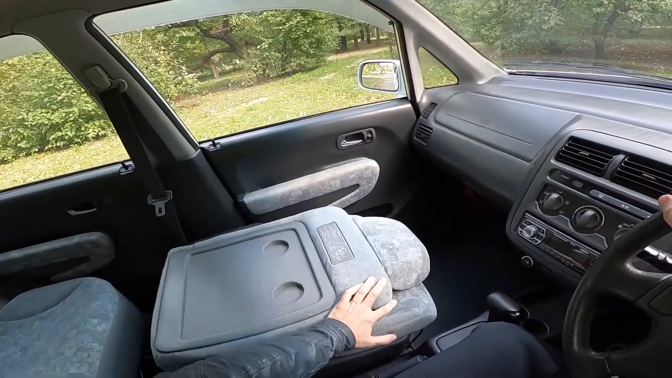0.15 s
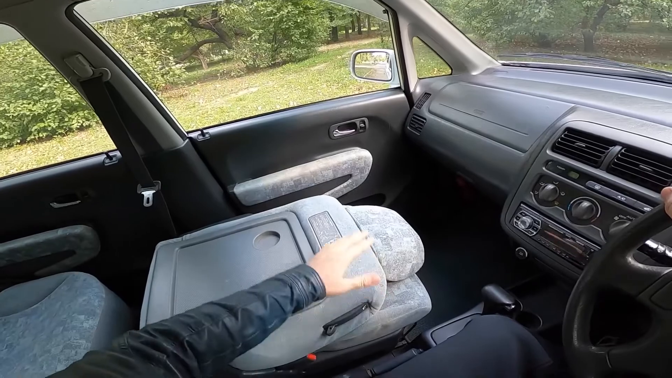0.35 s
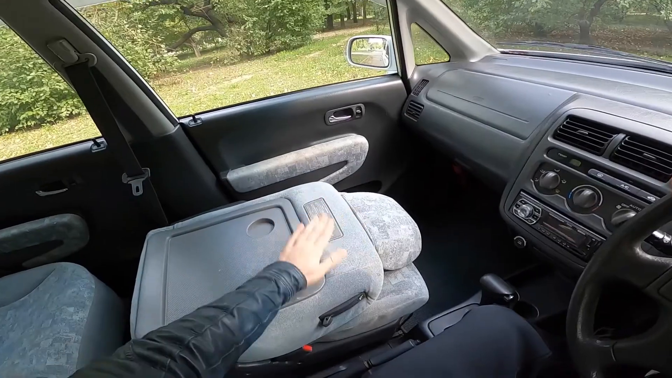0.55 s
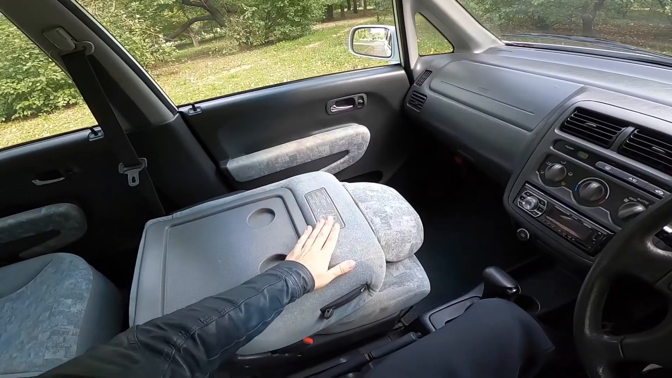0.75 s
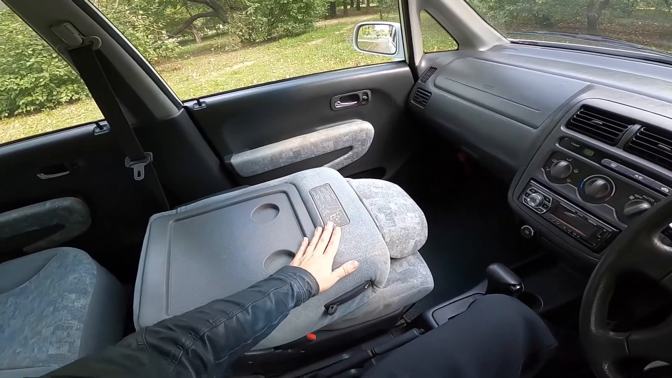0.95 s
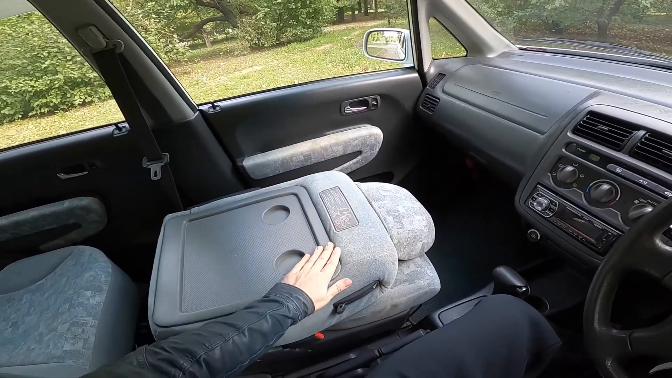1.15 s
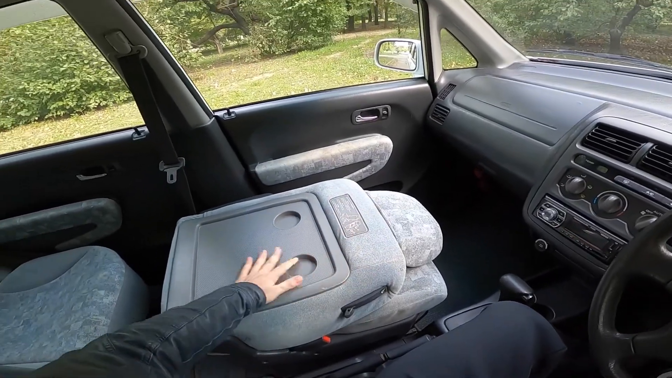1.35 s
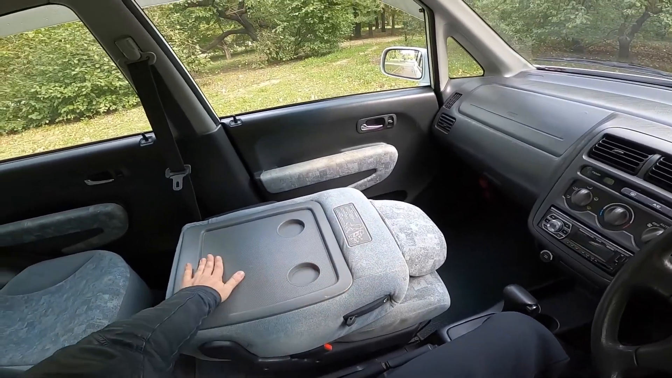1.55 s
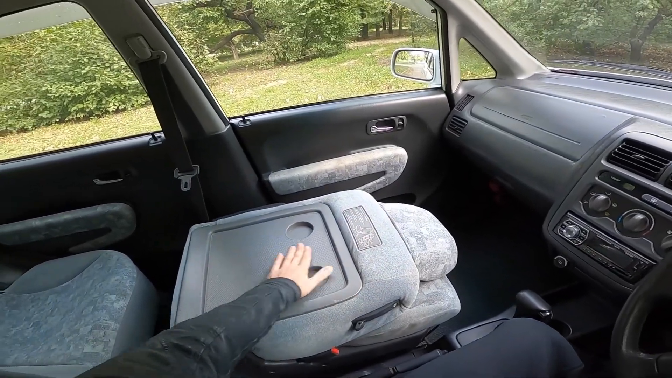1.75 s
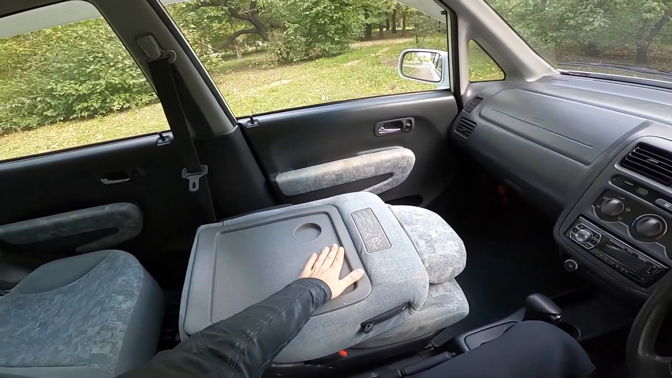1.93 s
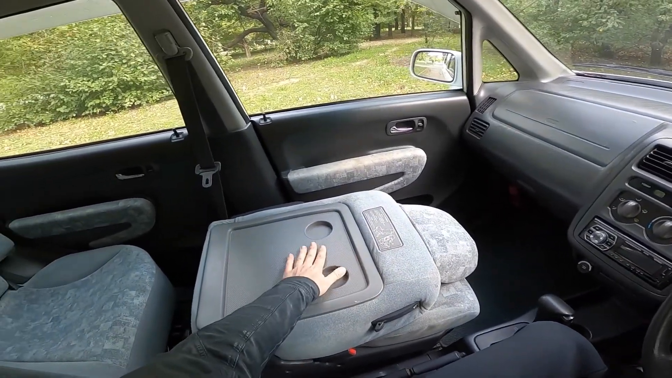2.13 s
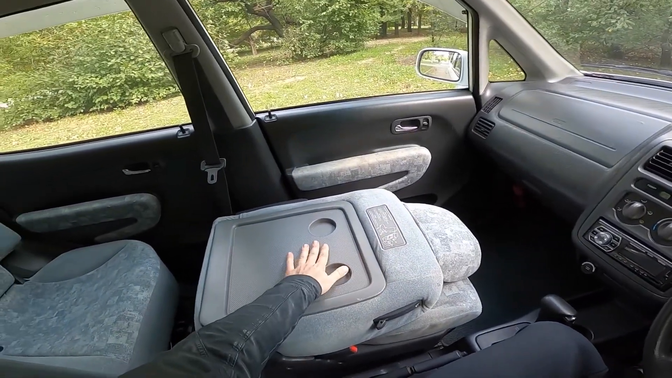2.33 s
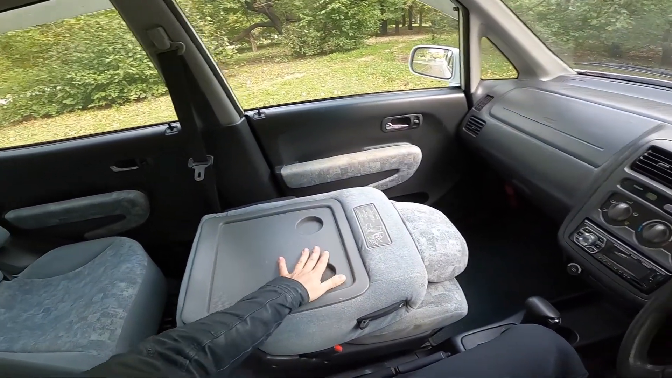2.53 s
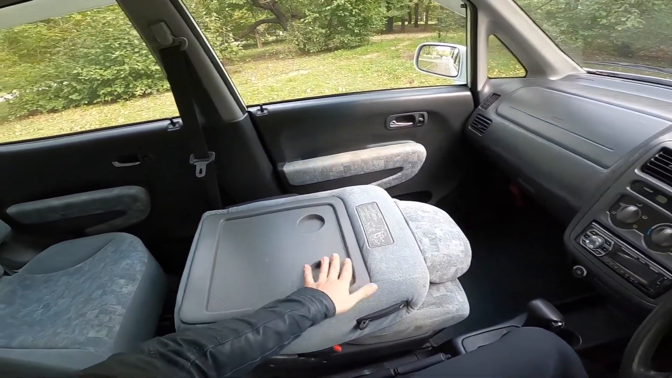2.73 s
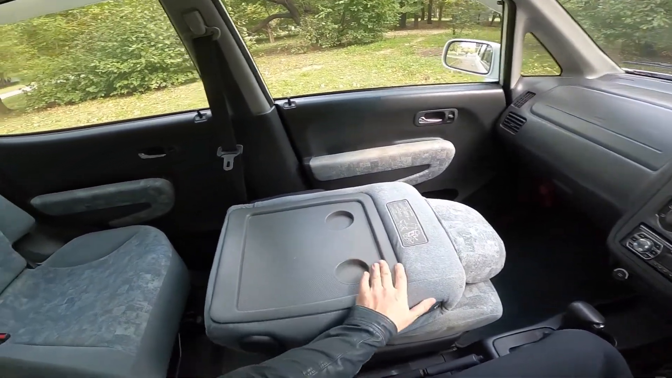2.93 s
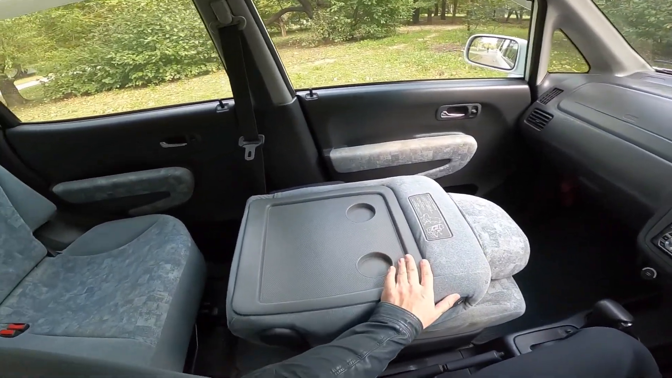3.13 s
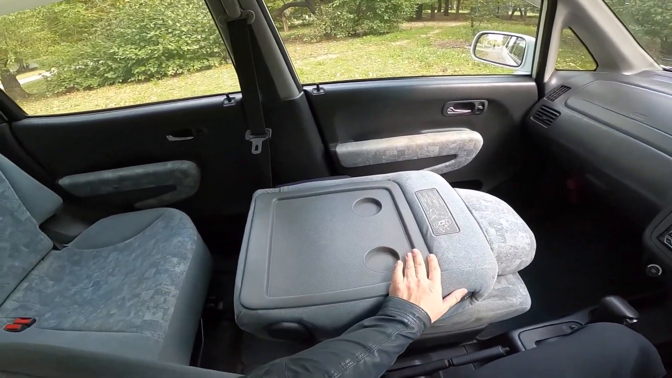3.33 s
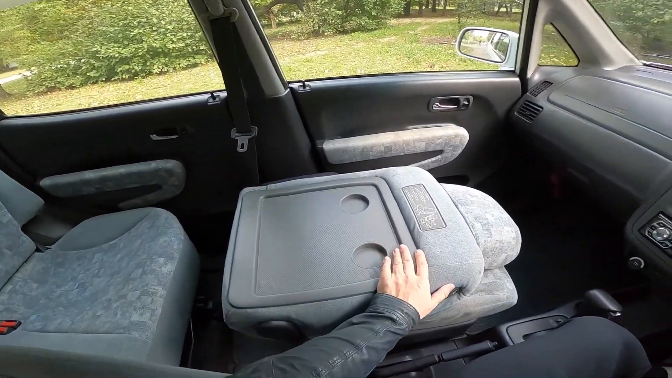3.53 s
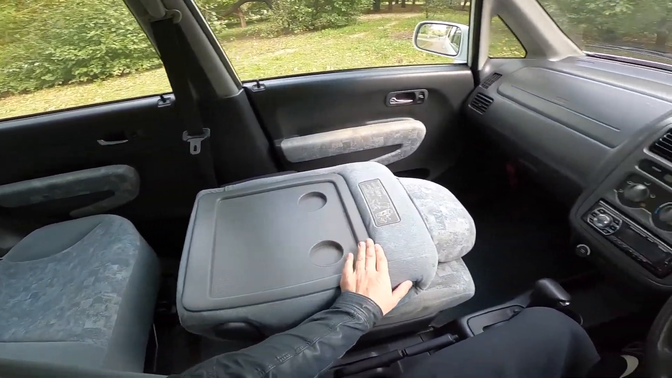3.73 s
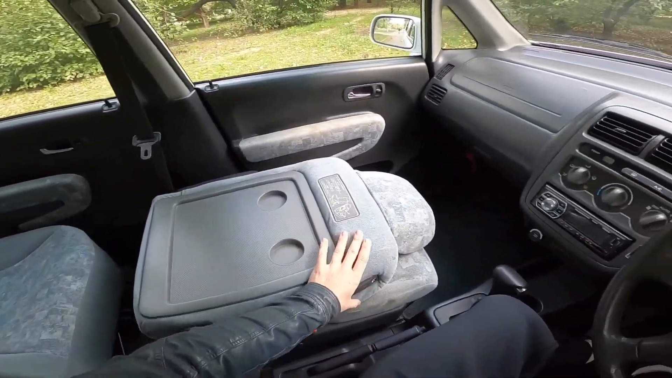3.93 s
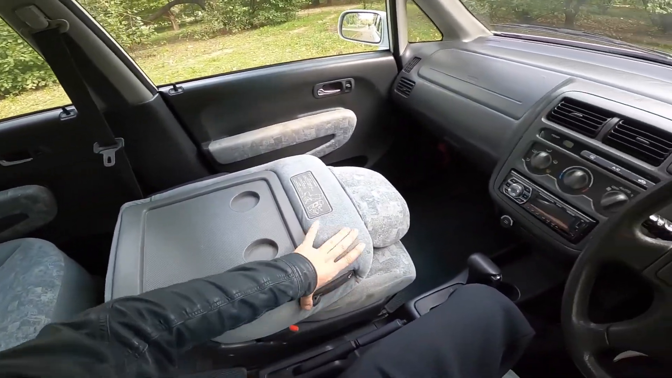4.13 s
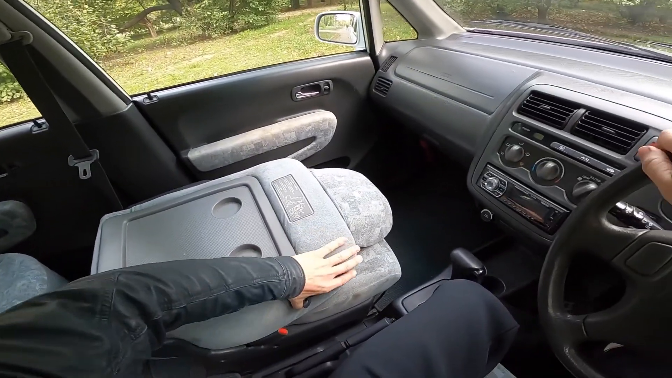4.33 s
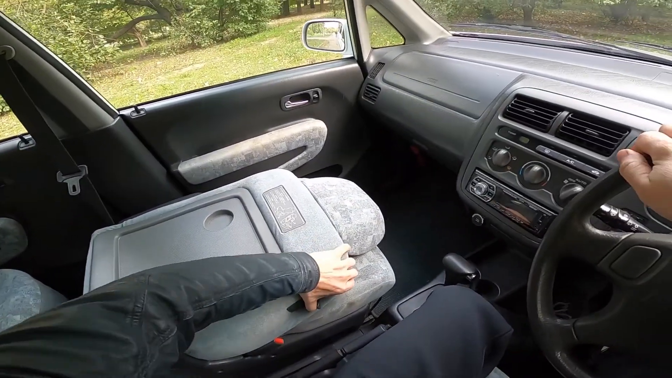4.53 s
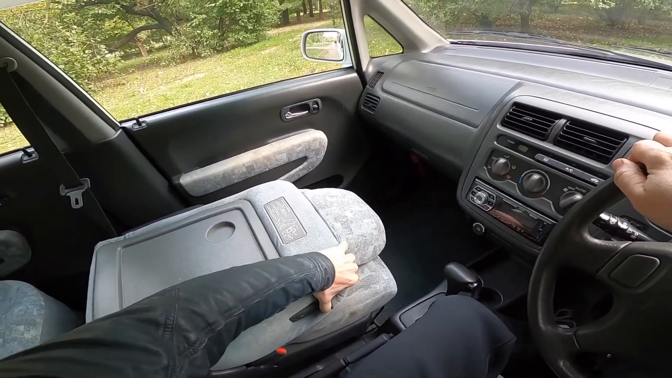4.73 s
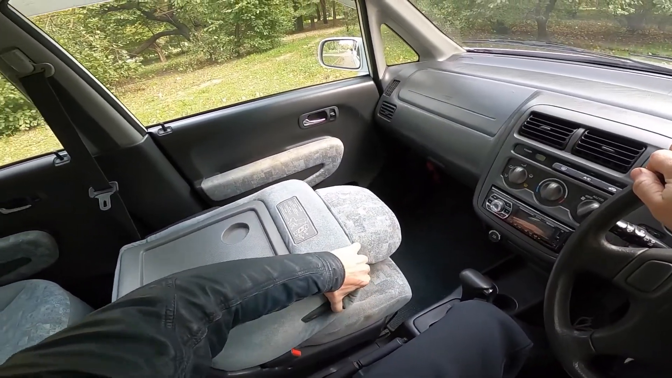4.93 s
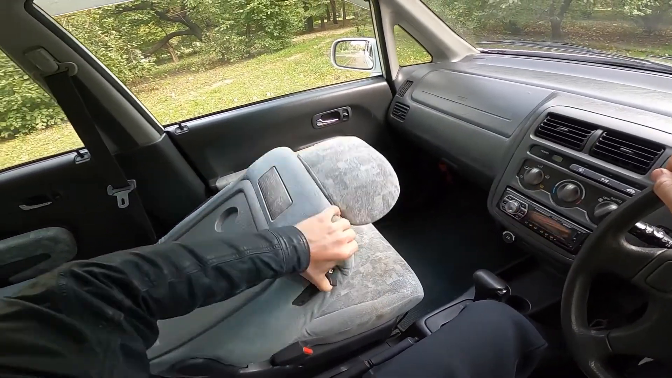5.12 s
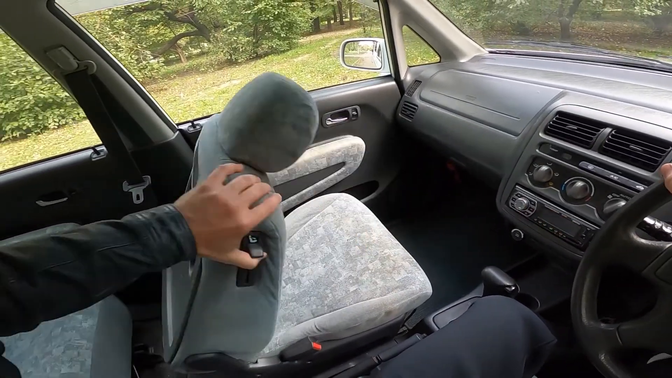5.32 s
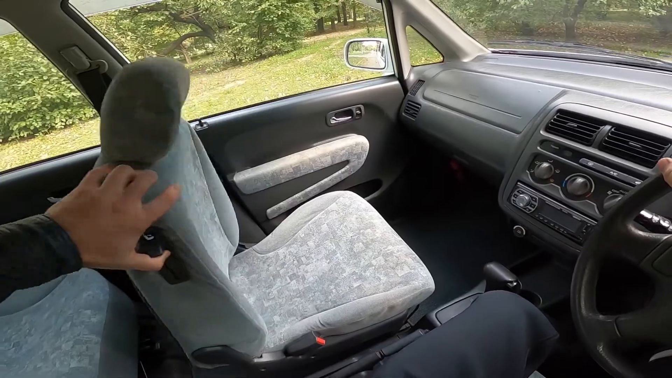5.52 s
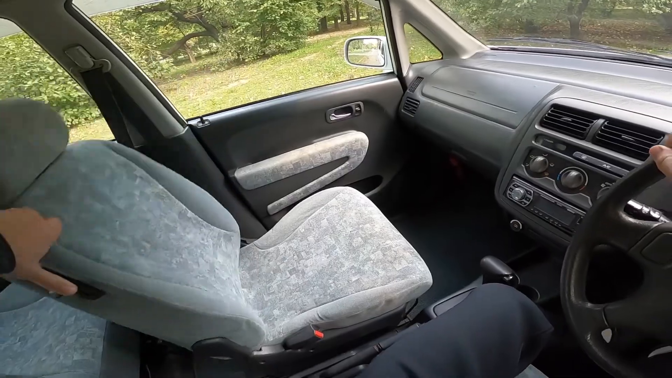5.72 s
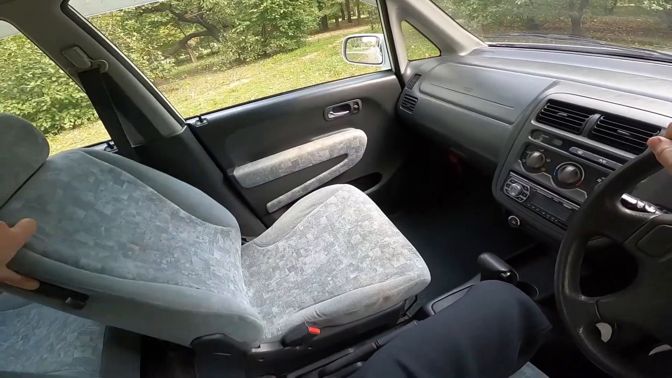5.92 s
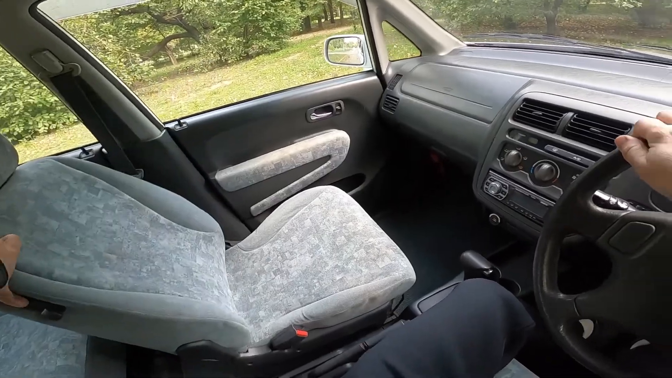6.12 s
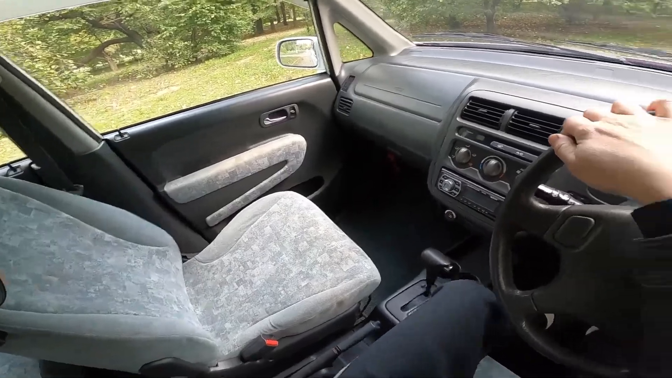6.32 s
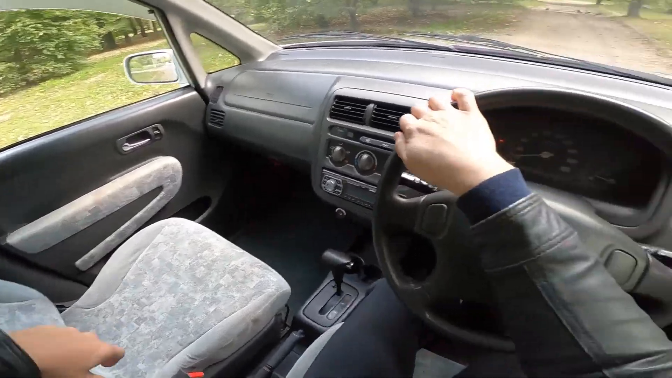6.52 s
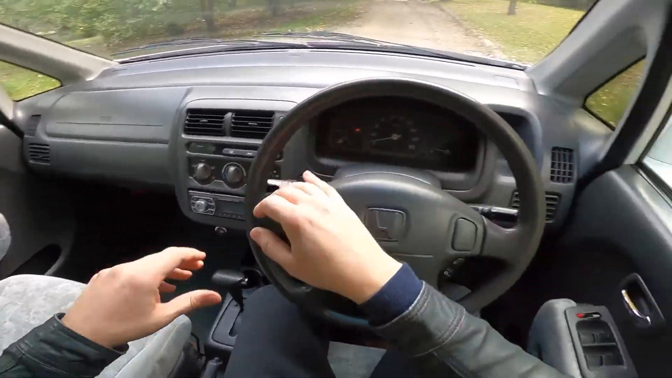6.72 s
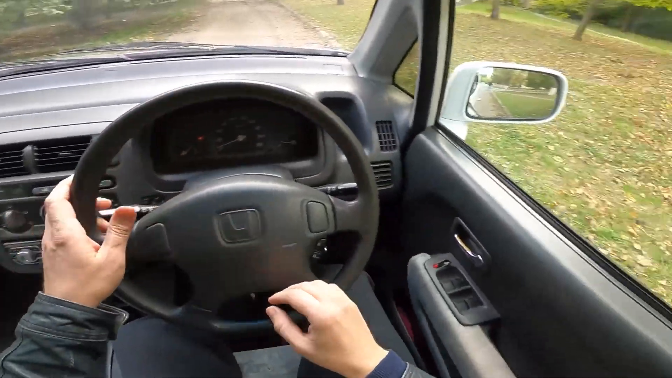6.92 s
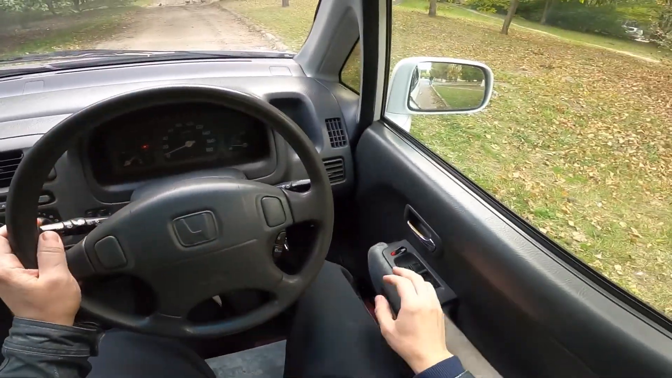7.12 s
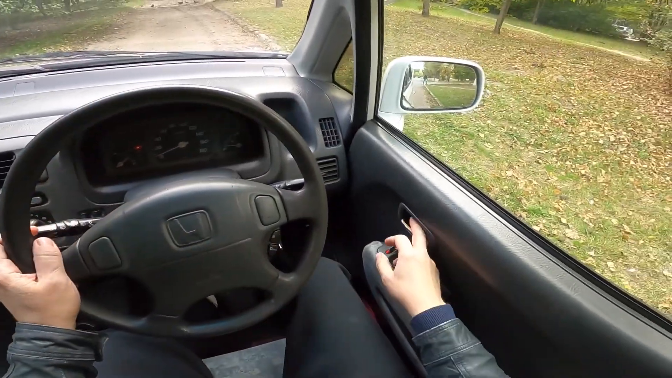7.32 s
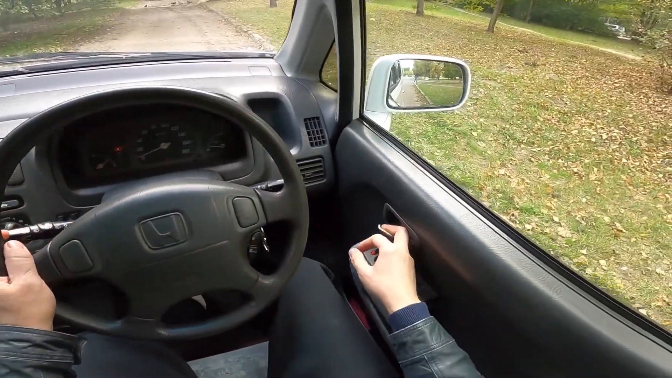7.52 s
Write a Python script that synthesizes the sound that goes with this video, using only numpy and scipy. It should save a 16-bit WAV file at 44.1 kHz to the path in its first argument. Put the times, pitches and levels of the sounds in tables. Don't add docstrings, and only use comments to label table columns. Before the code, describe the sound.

Close inside a small parked car with a low idling hum, a hand slaps a folded seat's plastic tray, slaps again with thuds, then rubs it in loud grainy strokes. After a quieter stretch of sleeve rustle, a lever squeaks and clicks, the seat back swings and bangs into its lock, bounces faintly, and a door latch clacks with a drumming panel. Small stereo camera microphone near the arm, short dry cabin echoes.

```python
import sys
import numpy as np
from scipy import signal
from scipy.fft import rfft, irfft
from scipy.io import wavfile
from scipy.ndimage import uniform_filter1d

SR = 44100
rng = np.random.default_rng(int(sys.argv[2]) if len(sys.argv) > 2 else 0)


def volts_from_db(level):
    exponent = np.asarray(level, float) / 20
    return 10 ** exponent


def wav_out(sig):
    wavfile.write(sys.argv[1], SR, np.round(np.clip(np.atleast_2d(sig).T, -1, 1) * 32767).astype(np.int16))


N = 337806


def evened(x):
    return x / np.sqrt(np.mean(x ** 2) + 1e-20)


def read(points, hz):
    f, value = np.transpose(points)
    return np.interp(np.log(hz + 1), np.log(f + 1), value)


def add(mix, start_s, sound):
    part = mix[..., round(start_s * SR):][..., :sound.shape[-1]]
    part += sound[..., :part.shape[-1]]


def follow(s, db):
    return volts_from_db(np.interp(np.arange(N) / SR, s, db))


def moves(rows, shape, rest_db, rest_colour):
    s = np.arange(0, N / SR + .01, .001)
    peak, rise, fall, db, colour = np.transpose(rows)[..., None]
    away = np.maximum((peak - s) / abs(rise), (s - peak) / abs(fall))
    power = volts_from_db(np.maximum(2 * (db - 20 * away ** shape), -400))
    rest = volts_from_db(2 * rest_db)
    total = power.sum(0) + rest
    return s, 10 * np.log10(total), ((power * colour).sum(0) + rest * rest_colour) / total


# pitch_hz, likeness (1 = same)
LIKENESS = [(60, 1), (300, 0.98), (700, 0.88), (1500, 0.39), (3000, 0.74), (7000, 0.098), (15000, 0.54)]


def ported(colour_db, patchy_db, flicker_db, size):
    frames = 4 * N // size + 5
    hz = np.fft.rfftfreq(size, 1 / SR)[:, None]
    a, b, c, d, patches = rng.standard_normal((frames, len(hz), 5)).T
    patches = uniform_filter1d(patches, size=4, axis=0)
    patches = evened(uniform_filter1d(patches, size=12, axis=1))
    flicker = evened(uniform_filter1d(rng.standard_normal(frames), size=3))
    gain = volts_from_db(colour_db(hz, np.arange(frames) * size / 4 / SR))
    gain = gain / np.sqrt((gain ** 2).mean(0))
    gain = gain * volts_from_db(patchy_db * patches + flicker_db * flicker)
    same = np.clip(read(LIKENESS, hz), -1, 1)
    left = a + 1j * b
    right = same * left + np.sqrt(1 - same ** 2) * (c + 1j * d)
    spectra = np.array([left, right]) * gain
    return evened(signal.istft(spectra, nperseg=size, noverlap=3 * size // 4)[1][:, :N])


# time_s, level_db
IDLE_LEVEL = [(0, -53), (.45, -39), (1.1, -31), (1.2, -36.5), (1.47, -32.5), (1.73, -37.5), (2.15, -30.5),
              (3.5, -29.5), (4.5, -30), (5.67, -31), (6.2, -35.5), (6.4, -35), (6.6, -36.5), (7.1, -32.5),
              (7.66, -27)]
# multiple of the turning rate, level_db
IDLE_ORDERS = [(1, 0), (2, -22.5), (4.5, -16)]
IDLE_HZ = 24.1


def idle():
    t = np.arange(N) / SR
    orders = 0
    for multiple, db in IDLE_ORDERS:
        orders = orders + volts_from_db(db) * np.sin(2 * np.pi * (multiple * IDLE_HZ * t + rng.random()))
    return np.sqrt(2) * follow(*np.transpose(IDLE_LEVEL)) * orders


# pitch_hz, level_db (per Hz)
CABIN_COLOUR = [(18, -24), (30, 4), (80, -22.5), (107, -14), (140, -17), (202, -22), (309, -30),
                (367, -34.5), (428, -36), (926, -51), (1240, -48.5), (3000, -81), (3900, -101),
                (6600, -120)]
# (above 200 Hz, against the boom)
SHAKES = [
    (.19, 0.62, 0.25, -22.5, -4.5),
    (.74, 0.36, 0.26, -29, -4),
    (1.55, 0.75, 4.1, -38, 1.5),
    (4.3, 6, 5.3, -38, 6),
    (2.94, 0.84, 0.44, -41, 2.5),
    (5.95, 0.45, 0.24, -21, -4.5),
    (6.78, 0.44, 1.6, -35.5, -2.5),
    (7.66, 0.88, .5, -34, 0.5),
]


def rumble():
    s, db, hum_db = moves(SHAKES, shape=1.24, rest_db=-41.5, rest_colour=-4)

    def colour_db(hz, at):
        return read(CABIN_COLOUR, hz) + np.interp(at, s, hum_db) * (hz > 200)
    return follow(s, db + 1.0) * ported(colour_db, 0.51, 1.92, size=2048)


# pitch_hz, level_db (per Hz)
CLOTH_COLOUR = [(350, -30.5), (600, -1), (716, -1.5), (903, -9), (980, -1), (1200, -5.5), (1380, -6),
                (1760, -9.5), (2080, -6.5), (2350, -9.5), (6440, -18.5), (12400, -37.5), (15600, -55.5)]
# peak_s, rise_s, fall_s, level_db, brightness_db (per octave)
ARM_MOVES = [(0, .1, 0.29, -46.5, -2), (.5, .5, 1, -61, -2), (1.15, .5, .3, -65.5, 7.5),
             (1.48, 0.25, 0.1, -45, 4), (1.77, .2, .13, -47.5, 6.5), (2.03, 0.088, 0.2, -48.5, 5),
             (2.5, 0.14, 0.23, -52.5, 2.5), (2.78, 0.16, 0.42, -51.5, 1.5), (3.49, 0.22, .07, -59.5, -4),
             (3.68, .25, .5, -59, -1), (3.88, 0.37, .1, -58.5, 5.5), (4.03, 0.25, .5, -58.5, 2),
             (4.42, 0.59, .5, -59.5, 4.5), (4.82, 0.34, 0.25, -60.5, 0.5), (5.18, .6, 0.51, -59, 0),
             (5.72, 1.1, 0.36, -53, 1.5), (5.88, .1, 0.12, -48, -2), (6.38, 0.074, 0.16, -71.5, 7.5),
             (6.5, .2, .2, -66.5, -0.5), (6.58, 0.025, .25, -59, 2.5), (6.98, 0.42, .35, -52.5, 1),
             (7.18, 0.14, .06, -54.5, 1.5), (7.38, 0.22, .28, -53.5, 0), (7.6, 0.14, .2, -60.5, -1.5)]


def sleeve():
    s, db, tilt = moves(ARM_MOVES, shape=1.57, rest_db=-69.5, rest_colour=-1.5)

    def colour_db(hz, at):
        return read(CLOTH_COLOUR, hz) + np.interp(at, s, tilt) * np.log2(hz / 2500 + 0.077)
    return follow(s, db + 2.0) * ported(colour_db, 1.4, 0.26, size=256)


# start_s, length_s, pitch_hz, width_hz, level_db
SQUEAKS = [(0.32, 0.015, 3200, 400, -60), (0.341, 0.018, 880, 200, -53), (0.384, 0.022, 3240, 400, -59.5),
           (1.053, 0.035, 2210, 150, -57.5), (4.627, 0.04, 1326, 200, -56.5),
           (4.725, 0.048, 1035, 250, -51), (4.729, 0.032, 750, 250, -49), (4.82, 0.057, 1050, 250, -48.5),
           (4.82, 0.062, 783, 200, -46), (4.907, 0.054, 2050, 200, -66), (5.135, 0.024, 970, 120, -40),
           (5.923, 0.062, 6300, 200, -73), (6.099, 0.019, 1017, 120.5, -52),
           (7.384, 0.032, 750, 160, -47.5), (7.538, 0.072, 2584, 99, -59)]


def squeaks():
    out = np.zeros(N)
    for s, length, hz, width_hz, db in SQUEAKS:
        t = np.arange(0, length, 1 / SR)
        r = np.exp(-np.pi * width_hz / SR)
        a, b = rng.standard_normal((2, SR // 4))
        drift = signal.lfilter([1], [1, -2 * r, r * r], a + 1j * b).real
        wobble = 1.1 + evened(drift)[-len(t):]
        tone = np.sin(2 * np.pi * hz * t) * signal.windows.tukey(len(t), .35)
        add(out, s, volts_from_db(db) * wobble * tone)
    return out


def thumps(blows, cycles):
    t = np.arange(SR // 2) / SR
    out = np.zeros(N)
    frame = signal.butter(2, [150, 480], "band", fs=SR, output="sos")
    rattles = evened(signal.sosfilt(frame, rng.standard_normal((len(blows), len(t)))))
    for (s, db, start_hz, end_hz, rattle_db), rattle in zip(blows, rattles):
        turns = np.cumsum(end_hz + (start_hz - end_hz) * np.exp(-t / .018)) / SR
        push = volts_from_db(-60 * t * end_hz / cycles) * np.sin(2 * np.pi * turns)
        push = push + volts_from_db(rattle_db - 60 * t / 0.091) * rattle
        add(out, s, volts_from_db(db) * push * np.minimum(t / 0.0034, 1))
    return out


# start_s, level_db (peak), start_hz, end_hz, rattle_db
DOOR_THUMPS = [
    (7.589, -24, 193.7, 132.2, -1.5),
    (7.61, -17.5, 212, 152.6, -9.5),
    (7.642, -18, 152.3, 97.2, -8.5),
    (7.651, -10.5, 110, 90, -7.5),
]


def door_thumps():
    return thumps(DOOR_THUMPS, cycles=61)


# start_s, level_db (peak), start_hz, end_hz, rattle_db (seat frame)
SEAT_THUMPS = [(.045, -19, 167, 72, -2), (.069, -10.5, 80, 63.5, -22), (0.111, -10, 38, 36.4, -28),
               (0.138, -17.5, 100, 58, -20), (0.277, -20.5, 96, 60, -14.5), (0.631, -7.5, 123, 42, -7.5),
               (0.785, -22, 50, 36.5, -21), (.888, -8.5, 90, 43, -7.5), (1.392, -20, 117, 81, -20),
               (1.518, -24.5, 128, 60, -7.5), (2.049, -22.5, 67.4, 62, -30), (2.817, -16, 108, 87.4, -19.5),
               (2.829, -21.5, 95, 62, -19), (4.929, -24, 84, 63.7, -18), (5.8246, -8, 92, 74.8, -6.5),
               (5.843, -9.5, 44.7, 40.3, -9), (5.867, -18.5, 46, 42, -5.5), (5.9, -18.5, 168, 139, -9),
               (5.927, -20, 37, 32.9, -9.5), (5.984, -24.5, 75.8, 44.6, -12.5),
               (6.071, -23, 55, 44.3, -15.5)]


def seat_thumps():
    return thumps(SEAT_THUMPS, cycles=15)


# pitch_hz, level_db (per Hz)
SKIN_COLOUR = [(250, -47), (450, -1.5), (580, -40), (720, -2.5), (1400, -5), (2600, -7.5), (3600, -10.5),
               (5000, -14), (8800, -28), (12000, -47), (15600, -54)]
# pitch_hz, width_hz, level_db (over the scrape)
TRAY_MODES = [(890, 70, 3), (1420, 100, 3), (2060, 110, 4), (3050, 120, 4), (3560, 160, 6), (4250, 150, 4),
              (5760, 150, 5), (2600, 150, -5)]
# middle_s, half_length_s, pitch_hz, width_hz, level_db (extra)
FREED_MODES = [(1.357, 0.032, 1610, 200, 12), (1.366, 0.031, 3570, 120, 13), (1.37, .04, 4300, 120, 15),
               (1.427, 0.031, 1396, 70, 17), (1.503, 0.056, 895, 60, 4), (1.53, 0.014, 2210, 130, 5.5),
               (1.466, 0.037, 4000, 200, 13.5), (1.47, 0.033, 4870, 100, 15), (1.45, 0.035, 5800, 80, 19),
               (1.72, 0.035, 954, 60, 6), (1.698, 0.02, 2060, 130, 7.5), (1.72, .03, 3740, 100, 9),
               (1.755, 0.017, 2040, 100, 3.5), (1.806, .05, 1456, 80, 9), (1.796, 0.049, 3630, 150, 10),
               (1.806, 0.052, 4220, 150, 4.5), (1.872, 0.018, 810, 120, 3.5), (2.716, 0.044, 1335, 120, 10),
               (2.734, 0.019, 3070, 130, 6.5), (2.74, 0.012, 3800, 150, 7.5), (2.736, 0.028, 2000, 130, 8),
               (4.883, 0.018, 1770, 150, 12)]
# peak_s, rise_s, fall_s, level_db, brightness_db (per octave)
STROKES = [(1.04, 0.029, 0.081, -59, 1.5), (1.31, 0.13, 0.042, -52.5, 1.5), (1.345, 0.022, 0.22, -39, -2.5),
           (1.5, 0.135, 0.051, -25.5, 0.5), (1.716, 0.036, 0.024, -25.5, 2),
           (1.77, 0.068, 0.11, -26.5, 5.5), (1.852, 0.19, 0.04, -27, -0.5), (2.056, 0.15, 0.084, -48.5, -2),
           (2.178, 0.016, 0.042, -48.5, -2.5), (2.64, .02, 0.19, -46.5, -16), (2.757, 0.11, 0.012, -29, -2),
           (2.79, 0.056, 0.032, -50, 13.5), (4.632, 0.089, 0.15, -55, -0.5),
           (4.74, 0.016, 0.024, -54.5, -2.5), (4.85, 0.04, 0.063, -46.5, -4.5),
           (7.595, 0.013, 0.22, -44.5, 6), (7.645, 0.061, 0.05, -36.5, -19.5)]


def palm():
    s, db, tilt = moves(STROKES, shape=1.9, rest_db=-120, rest_colour=0)

    def colour_db(hz, at):
        level = read(SKIN_COLOUR, hz) + np.interp(at, s, tilt) * np.log2(hz / 2500 + 0.12)
        for f, width, d in TRAY_MODES:
            level = level + d / (1 + ((hz - f) / width) ** 2)
        for middle, half, f, width, d in FREED_MODES:
            freed = np.exp(-((at - middle) / half) ** 4)
            level = level + d / (1 + ((hz - f) / width) ** 2) * freed
        return level
    grains = np.repeat(rng.exponential(1, N // 40 + 1), 40)[:N]
    catches = volts_from_db(0.96 * uniform_filter1d(grains, size=30))
    return follow(s, db) * evened(ported(colour_db, 2.0, 0.46, size=512) * catches)


# pitch_hz, level_db (per Hz)
PLASTIC_COLOUR = [(410, -27), (620, -10), (800, 0.5), (1360, -1.5), (1530, -2.5), (2740, -4), (3240, -6),
                  (3940, -8.5), (4320, -6.5), (5110, -12.5), (8930, -21), (15600, -52.5)]


def clacks(rows, hard):
    t = np.arange(8192) / SR
    hz = np.fft.rfftfreq(8192, 1 / SR)
    out = np.zeros(N)
    rise = np.minimum(t / (0.0009 + 0.0033 * (1 - hard) ** 2), 1)
    crack = 3.0 * hard * np.exp(-t / .0012)
    for s, db, ring_hz, tilt, t60, in rows:
        burst = rng.standard_normal(len(t)) * (volts_from_db(-60 * t / max(t60, .01)) + crack) * rise
        ring_db = 10 * np.log10(1 + 4.0 / (1 + ((hz - ring_hz) / 200) ** 2))
        tilt_db = tilt * np.log2(np.maximum(hz, 1100) / 2500)
        colour_db = np.maximum(read(PLASTIC_COLOUR, hz) + tilt_db + ring_db, -100)
        log_gain = np.log(volts_from_db(colour_db))
        circle = np.concatenate([log_gain, log_gain[-2:0:-1]])
        causal = np.exp(np.conj(signal.hilbert(circle)))[:len(hz)]
        clack = irfft(rfft(burst) * causal)
        add(out, s, volts_from_db(db - 3.0) * clack / abs(clack).max())
    return out


# start_s, level_db (peak), ring_hz, brightness_db (per octave), decay_s (60 dB)
PATS = [(.03, -16.5, 2500, -1, 0.091), (.118, -30.5, 900, -7, 0.064), (.174, -28, 1000, -5, 0.055),
        (.771, -40, 860, -3, 0.062), (.883, -15.5, 870, -3.5, 0.041), (.889, -21.5, 840, 2.5, 0.026),
        (2.797, -40, 700, -11, 0.045), (4.728, -40.5, 1000, -1, .09), (4.818, -42, 1000, -1, 0.27),
        (1.029, -40, 810, -3.5, 0.27), (1.333, -28, 1430, 2, 0.17), (1.679, -18.5, 860, 0, 0.1),
        (1.962, -34.5, 1980, 0.5, 0.13), (2.468, -21.5, 2300, -0.5, 0.037),
        (2.634, -31.5, 1300, -1.5, .086), (2.808, -31.5, 2300, 5, 0.16), (5.638, -34.5, 700, -5.5, 0.051),
        (5.8074, -23.5, 1110, 0, 0.14), (5.813, -16.5, 1112, -2, 0.16), (5.868, -21.5, 1200, -1, 0.091),
        (5.845, -32.5, 930, -15.5, 0.11), (5.856, -31, 2980, 2.5, 0.1), (7.653, -18, 929, -1, .091)]


def pats():
    return clacks(PATS, hard=0.049)


# start_s, level_db (peak)
BOUNCES = [
    (5.924, -27),
    (5.965, -31),
    (6.009, -35),
    (6.066, -44),
    (6.103, -42),
    (6.136, -41),
    (6.193, -46),
]


def bounces():
    return clacks([(s, db, 1000, -8, 0.039) for s, db in BOUNCES], hard=0.25)


# start_s, level_db (peak), ring_hz, brightness_db (per octave), decay_s (60 dB)
KNOCKS = [(.043, -14, 4270, 4, 0.028), (.059, -18, 1320, -3.5, 0.045), (.349, -45, 1010, -2, 0.036),
          (.282, -23, 950, -5, 0.051), (.386, -38, 824, -3.5, 0.096), (.727, -23.5, 3060, -5, 0.066),
          (.617, -20.5, 1190, -6, 0.12), (.6255, -11, 3750, 2.5, 0.076), (.867, -23.5, 960, 4, 0.14),
          (5.138, -18.5, 1880, -3, 0.054), (5.592, -33, 1240, -3.5, 0.054), (5.8185, -7.5, 11070, 8, 0.019),
          (5.822, -10, 3360, -1.5, 0.027), (5.887, -19.5, 1200, -4, .07), (6.019, -37, 1500, -9, .04),
          (6.118, -47, 1480, -2, .04), (6.368, -44, 847, 3.5, 0.064), (6.441, -46, 3620, 2, .05),
          (6.534, -46.5, 4530, 12, 0.058), (6.573, -41, 1050, 3.5, 0.16), (6.586, -40, 1100, 4, 0.067),
          (6.945, -35.5, 1200, -1.5, 0.036), (7.046, -36, 840, -2.5, 0.066), (7.057, -36, 6100, 2, 0.024),
          (7.606, -24.5, 960, 2, .07)]


def knocks():
    return clacks(KNOCKS, hard=0.25)


# start_s, level_db (peak), ring_hz, brightness_db (per octave), decay_s (60 dB)
SNAPS = [
    (.04, 2.8, 3360, -0.5, 0.0092),
    (.639, -20, 1080, -10, 0.046),
    (2.171, -32.5, 887, -1, 0.25),
    (2.372, -57.5, 3450, 7, .03),
    (5.404, -34, 1017, -4.5, 0.052),
    (5.8295, -6, 1600, 0, 0.022),
    (5.882, -7, 2400, -2.5, 0.02),
    (.629, -8, 794, -1, 0.035),
    (6.907, -38, 948, -3, 0.36),
    (7.585, -19.5, 696, -1, 0.14),
]


def snaps():
    return clacks(SNAPS, hard=0.63)


# pitch_hz, decay_s (60 dB)
CABIN_DECAY = [(200, 0.25), (1000, 0.082), (4000, 0.086), (12000, 0.047)]


def cabin(x):
    taps = np.zeros((2, SR // 4))
    jitter = rng.integers(0, 20, (2, (SR // 4 - 61) // 20))
    at = np.arange(60, SR // 4 - 20, 20) + jitter
    np.put_along_axis(taps, at, rng.choice([-1., 1.], at.shape), 1)
    taps[1] = 1.0 * taps[0] + 1.3 * taps[1]
    hz, t, z = signal.stft(taps, SR, nperseg=256)
    fading = volts_from_db(-60 * t / read(CABIN_DECAY, hz)[:, None])
    tail = signal.istft(z * fading, SR, nperseg=256)[1]
    return signal.fftconvolve(x[None], tail / np.linalg.norm(tail[0]), axes=1)[:, :N]


def scene():
    background = idle() + rumble() + sleeve()
    small = squeaks() + pats() + bounces() + knocks() + snaps()
    echoes = volts_from_db(-10.5) * cabin(small)
    return background + door_thumps() + seat_thumps() + palm() + small + echoes


# pitch_hz, lead_rad
PORT_LEAD = [(20, 0), (250, .06), (1000, .4), (3000, .7), (6300, 1.1), (9000, 2.2), (12000, 1.8),
             (15000, 1.5)]
# pitch_hz, level_db (left over right)
PORT_LEAN = [(20, -.3), (200, -.6), (700, -1.2), (1300, -.3), (2400, -1.4), (4400, -1), (8000, 2),
             (15000, 1)]


def two_ports(dry):
    padded = np.pad(dry, [(0, 0), (2048, 2048)], "reflect", reflect_type="odd")
    hz = np.fft.rfftfreq(padded.shape[1], 1 / SR)
    left = volts_from_db(read(PORT_LEAN, hz) / 2) * np.exp(.5j * read(PORT_LEAD, hz))
    spectra = rfft(padded) * np.array([left, 1 / left])
    return irfft(spectra * (hz < 15770))[:, 2048:-2048]


def low_pass(x):
    return signal.sosfilt(signal.butter(12, 15770, fs=SR, output="sos"), x)


def record(dry):
    ports = two_ports(dry)
    mix = ports * np.minimum(np.arange(N)[::-1] / 50, 1)
    return low_pass(mix)


dry = scene()
out = record(dry)
wav_out(out)
```